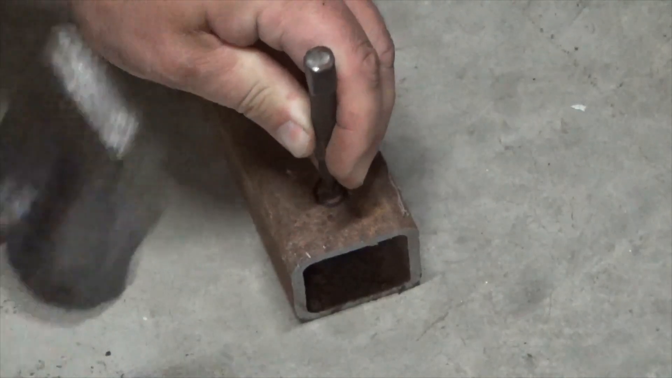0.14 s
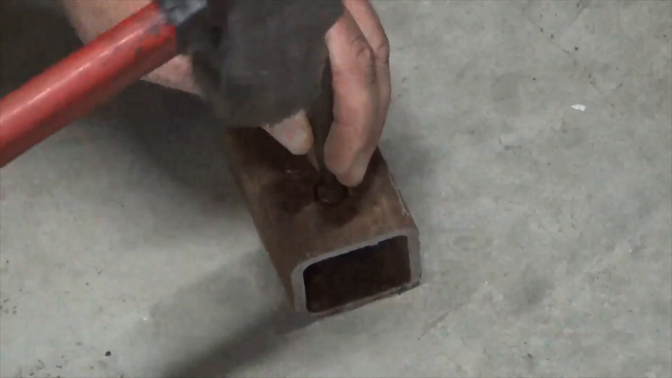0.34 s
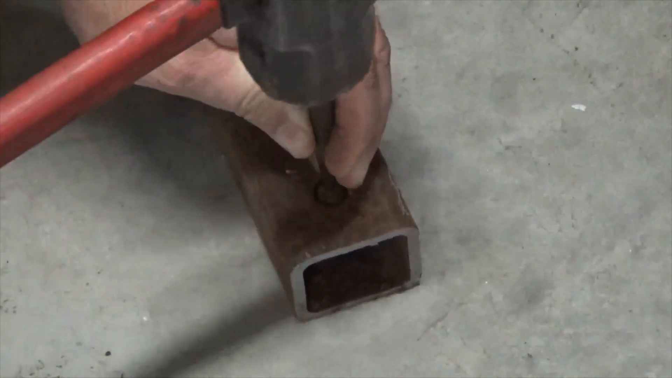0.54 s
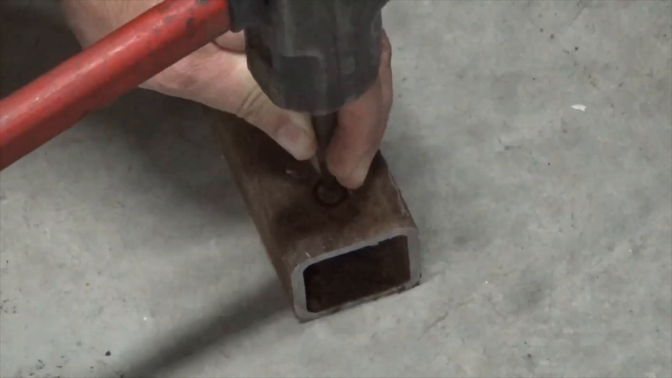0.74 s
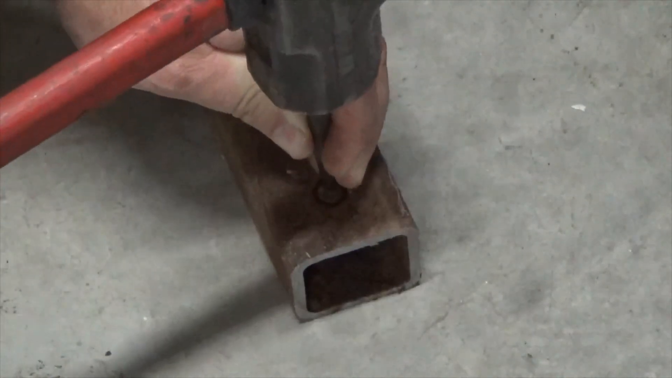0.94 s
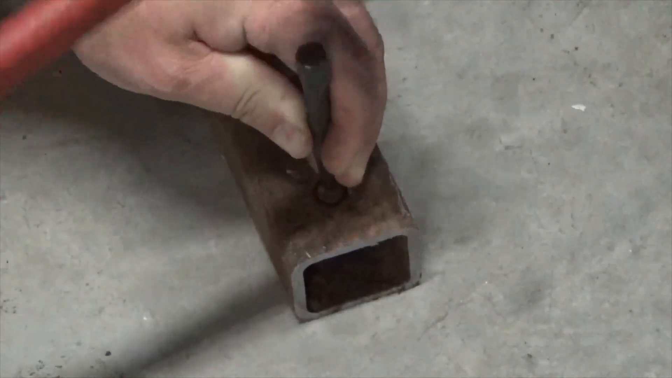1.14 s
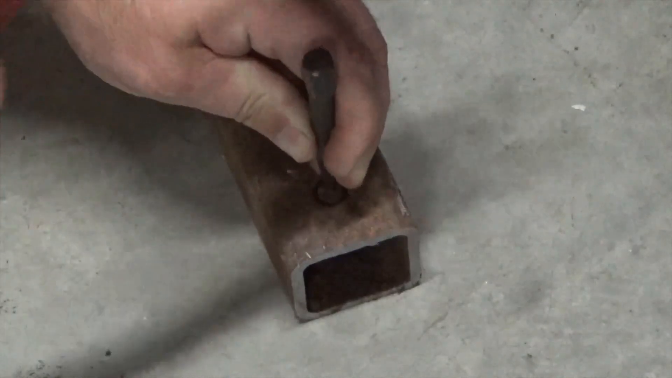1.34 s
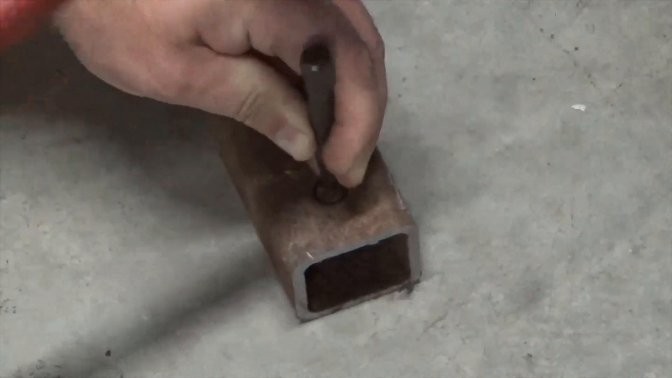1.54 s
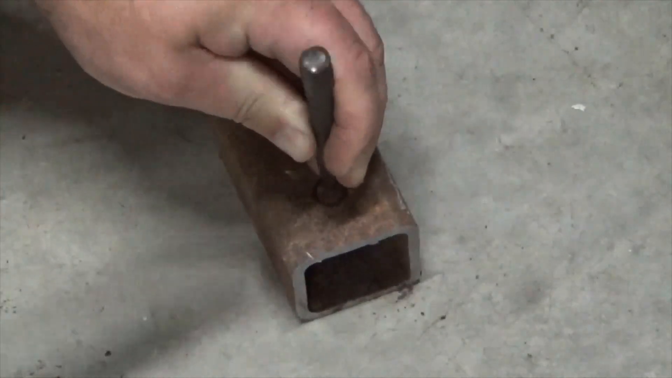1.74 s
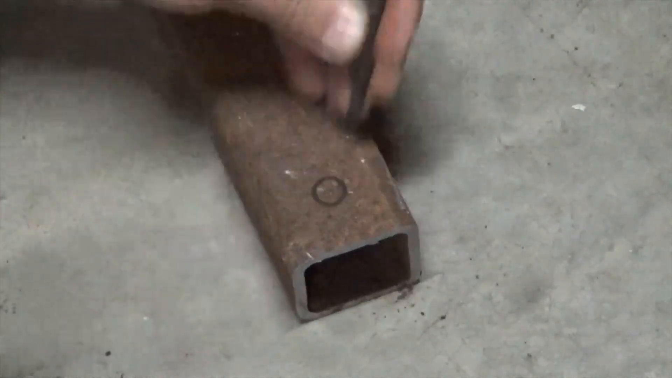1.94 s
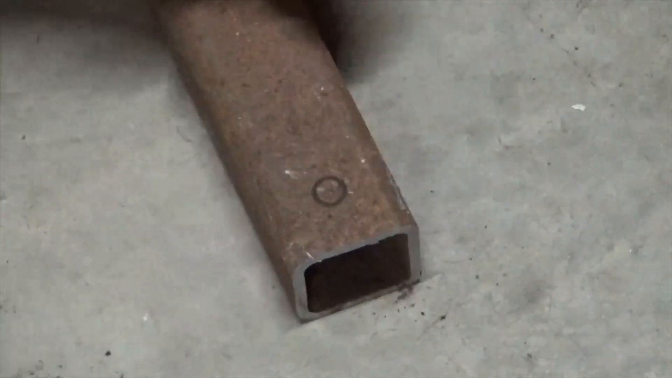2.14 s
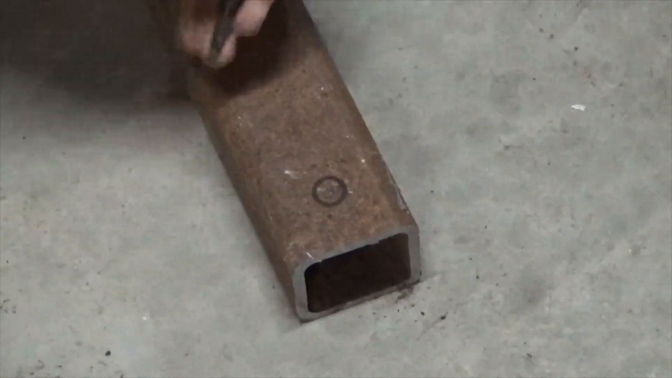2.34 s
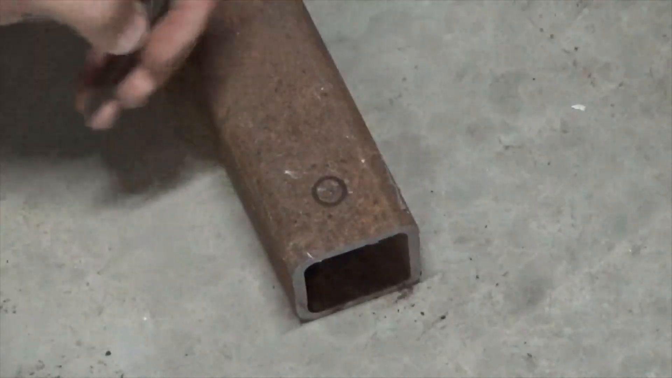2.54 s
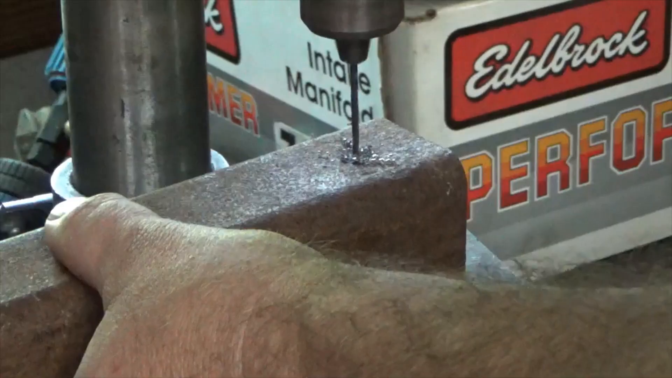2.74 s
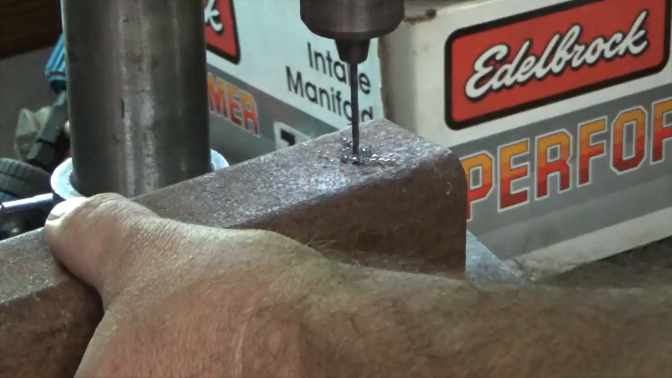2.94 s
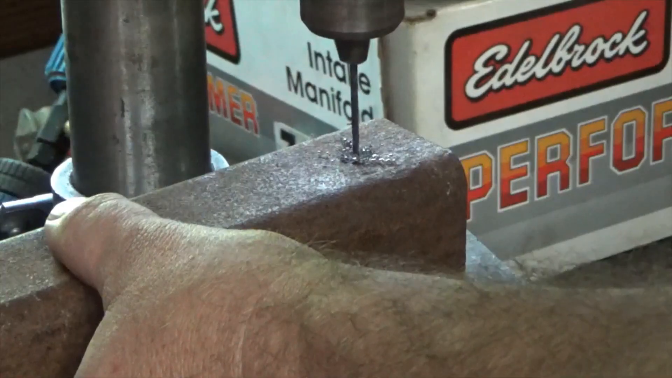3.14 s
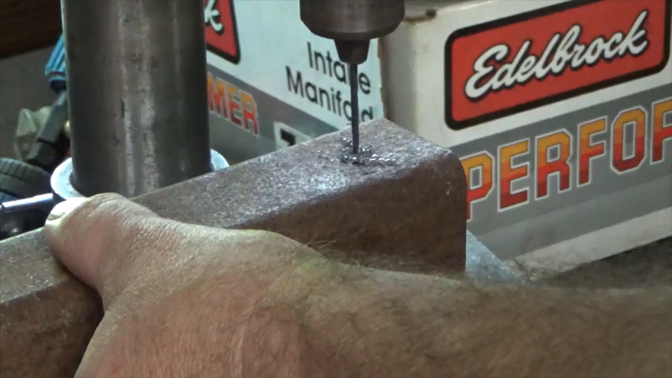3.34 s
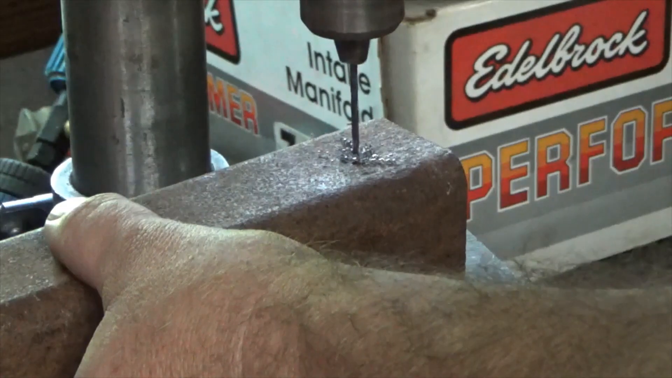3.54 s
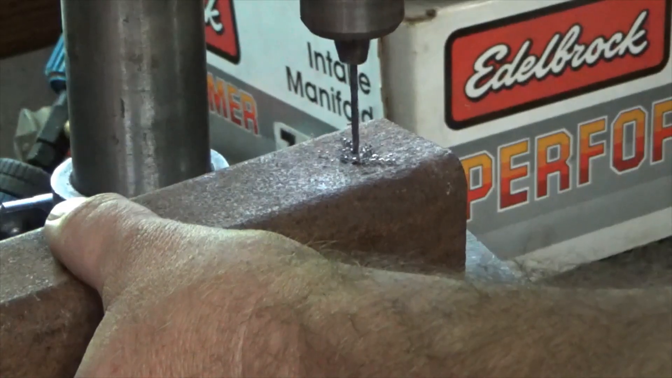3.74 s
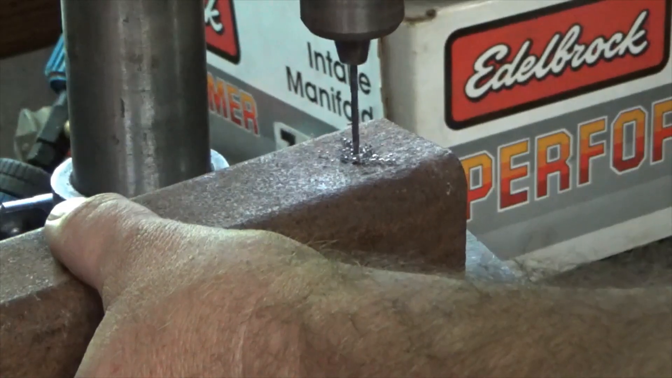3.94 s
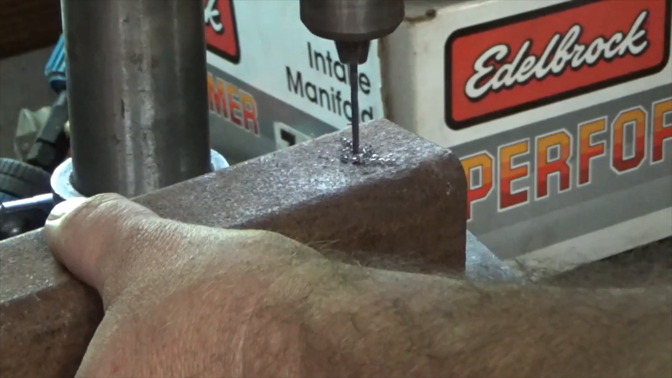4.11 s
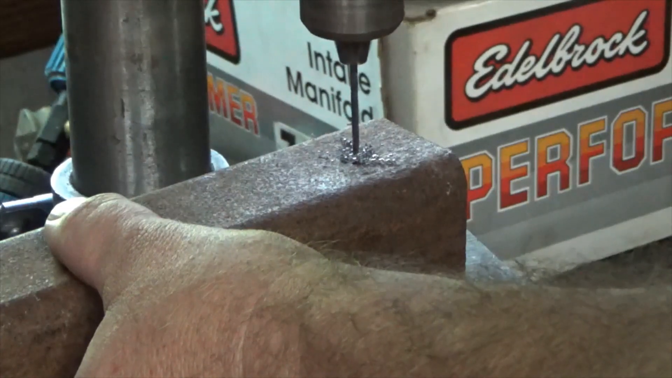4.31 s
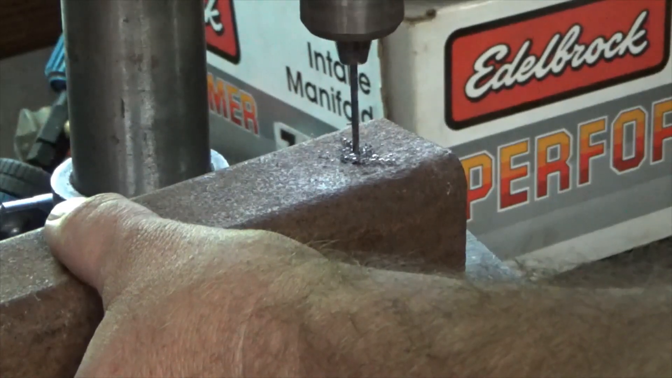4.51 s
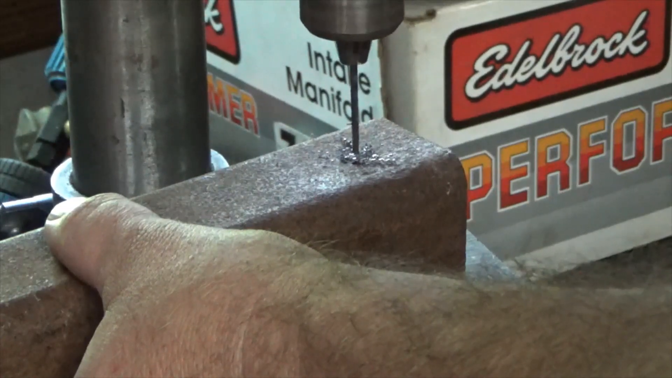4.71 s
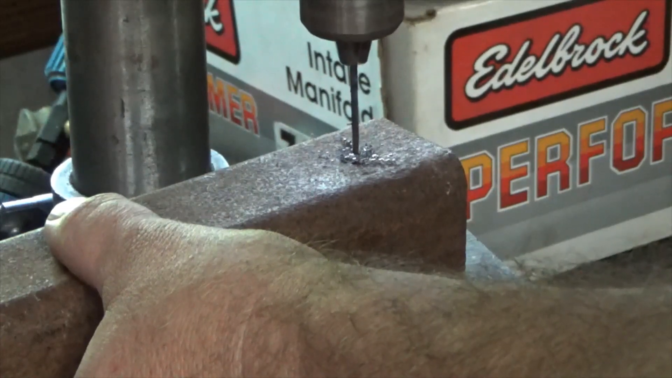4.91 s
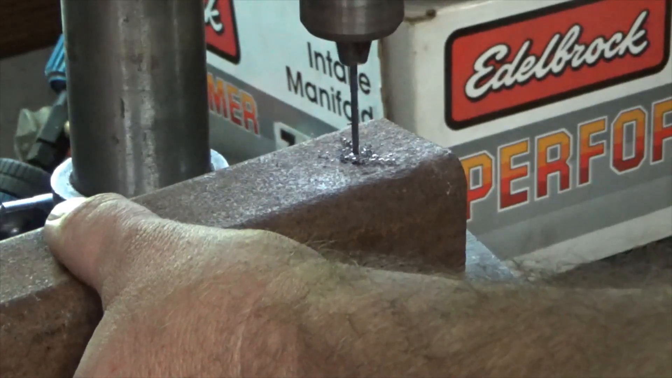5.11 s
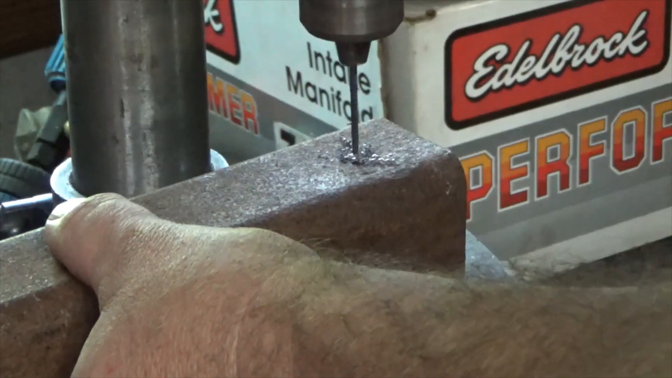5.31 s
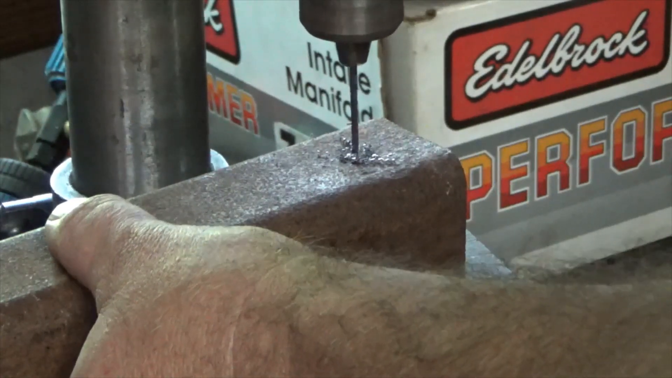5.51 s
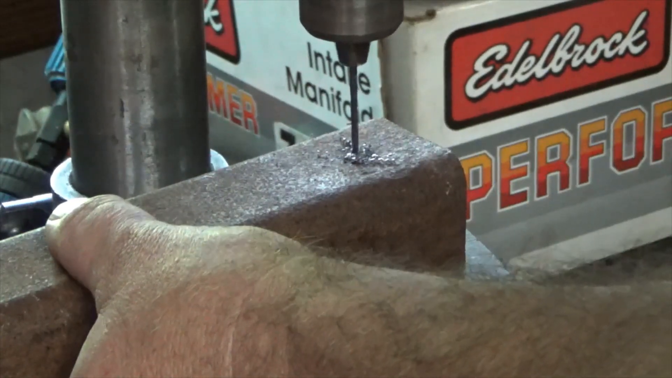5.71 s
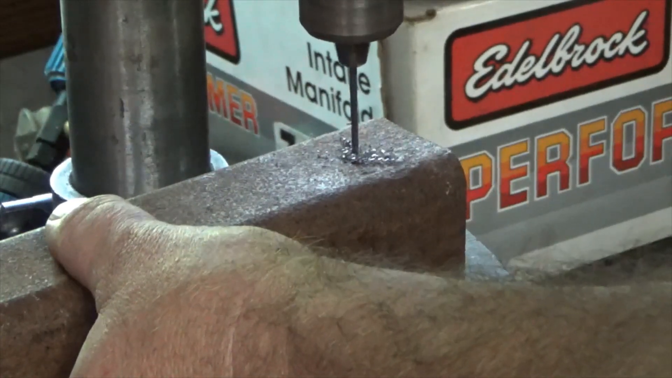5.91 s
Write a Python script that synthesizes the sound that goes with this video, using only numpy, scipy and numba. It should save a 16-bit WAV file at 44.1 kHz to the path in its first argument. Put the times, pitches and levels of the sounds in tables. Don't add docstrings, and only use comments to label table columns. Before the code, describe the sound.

Quiet garage with traffic rumble, two metallic hammer blows, a faint scrape, then an abrupt cut to a humming, crackling drill press biting metal.

```python
import sys
import numpy as np
from scipy import signal
from scipy.fft import rfft, irfft, next_fast_len
from scipy.io import wavfile
from scipy.ndimage import uniform_filter1d
from numba import njit

SR = 44100
rng = np.random.default_rng(int(sys.argv[2]) if len(sys.argv) > 2 else 0)


def gain_from_decibels(decibels):
    exponent = np.asarray(decibels, float) / 20
    return 10 ** exponent


def store_wav(level_fs):
    pcm = np.round(np.clip(np.atleast_2d(level_fs), -1, 1) * 32767)
    wavfile.write(sys.argv[1], SR, pcm.T.astype(np.int16))


N = 262836
T = np.arange(N) / SR
M = next_fast_len(N + SR)
F = np.arange(M // 2 + 1) * SR / M + 0.00085

# first_out_start_s, first_out_end_s, second_in_start_s, second_in_end_s
SHOT_CHANGE_S = (2.688, 2.713, 2.695, 2.757)

# freq_hz, t60_s
ROOM_T60 = [(125, 0.54), (500, 0.37), (2000, 0.48), (5000, 0.65), (10000, 0.41)]
# freq_hz, density_db_per_hz
QUIET_SPECTRUM = [(15, -56.5), (25, -38.5), (47, -8.5), (69, -6), (198, -11.5), (249, -15), (338, -12),
                  (415, -19.5), (448, -19), (2130, -29), (3200, -30.5), (3460, -32), (11200, -39),
                  (14600, -72.5), (22000, -120)]
# freq_hz, likeness_0_1
QUIET_ALIKE = [(60, 1.0), (130, 1), (270, 0.92), (560, 0.4), (1180, 0.1), (2500, 0.03), (5270, 0.27),
               (11100, 0.66)]
# time_s, level_db
TRAFFIC = [(0, -2), (.7, -0.5), (1.2, 0), (1.7, 3), (2.2, 1.5), (2.7, 5)]
# freq_hz, share_ratio
TRAFFIC_SHARE = [(60, .1), (120, 0.52), (300, 1.1), (960, 1.3), (2700, .05)]
# time_s, level_db, length_s
THUDS = [(.68, 2.5, .25), (1.134, -1.5, .15), (1.653, 3.5, .12), (2.55, 1.5, .25)]
# start_s, end_s, pitch_hz, level_db
DRONES = [(0, 1.3, 68.9, -61.5), (.25, 1.35, 297.6, -75), (.25, 1.3, 198, -67.5), (1., 1.67, 88, -62),
          (1.7, 1.7, 125, -59.5), (2.31, 2.44, 100.4, -55.5), (2.31, 3.4, 60.4, -62.5)]

# time_s, peak_db
BLOWS = [
    (0.748, -27),
    (1.387, -9),
]
# freq_hz, level_db, t60_s
HAMMER_MODES = [(4818, -18, .34), (4953, -8, .7), (5281, -10, .6), (5981, -13, .46), (6013, -8, .3),
                (6164, -4, .28), (6595, -18, .28), (7354, -28, .2),
                (3000, -15.5, 0.11), (3630, -10, .08), (8150, -30, 0.083), (9330, -18.5, 0.12),
                     (10750, -30.5, 0.037)]
TUBE_HZ = [2078, 2385, 2579, 2702, 2885, 3394, 3416, 3500, 3618, 4861, 4907, 4926, 5114, 5286, 5480, 5819,
           6067, 6315, 6519, 6790, 7230, 7483, 8818, 9200, 9454, 9502, 9593, 10300, 10620]
# level_db, t60_s
TUBE_DECAY = [(-24.5, .4), (-23.5, 0.86), (-23.5, 0.79), (-26.5, 0.88), (-15.5, 0.33), (-4.5, 1),
              (-2.5, 0.66), (-13.5, 0.513), (-14.5, .35), (-13.5, .6), (-8.5, 0.75), (-3, .45), (-22.5, .7),
              (-20, .6), (-30, 0.51), (-24, .45), (-17, 0.99), (-17.5, 0.403), (-1, 0.25), (-20, 0.5),
              (-13, 0.56), (-19, 0.19), (-28.5, 0.42), (-21.5, 0.66), (-12, 0.31), (-5, 0.45), (-16, 0.15),
              (-10, .1), (-16.5, 0.3)]
# freq_hz, density_db_per_hz
TAP_CRACK = [(59, -33), (100, -8), (420, -7.5), (2330, -20), (4360, -12), (5110, 2), (6470, -30.5),
             (11000, -42.5), (14300, -78.5), (22000, -120)]
# freq_hz, density_db_per_hz
STRIKE_CRACK = [(180, -36), (300, -7), (565, -7), (862, -30), (2100, -9.5), (3060, -28.5), (3400, -9),
                (3950, -20), (5020, -6.5), (8390, -16.5), (9600, -11.5), (11000, -23.5), (14300, -55),
                (22000, -120)]
# delay_s, pitch_hz, width_octaves, level_db, rise_s
TAP_SWELLS = [(0, 351.9, 0.5, -38.5, 0.0019), (0, 2800, .6, -40.5, 0.0029)]
# delay_s, pitch_hz, width_octaves, level_db, rise_s
STRIKE_SWELLS = [(0, 377.6, 0.44, -32, 0.021), (0, 2300, 0.38, -24.5, 0.014), (0, 4550, 0.46, -26, 0.019),
                 (0, 1105, .45, -34.5, 0.0092), (0.061, 2710, 0.355, -26, 0.0092),
                 (0.059, 297, 0.71, -30.5, 0.013)]
# freq_hz, level_db, t60_s
PUNCH_MODES = [(5340, -5, 0.5), (5804, -17, 0.21), (6169, -20.5, 0.53), (6900, 0.5, 0.17),
               (7450, -1.5, 0.27), (7900, -11, 0.17), (8543, -22, 0.16), (9685, -14, 0.3)]
# start_s, end_s, level_db
SCRAPES = [
    (2.348, 2.395, -58.5),
    (2.578, 2.587, -57),
]
# time_s, length_s, pitch_hz, width_octaves, level_db
SLEEVE = (2.02, .1, 6300, .45, -65.5)

HUM_DB = [-45, -36.5, -43, -39, -79, -97, -49.5, -51]
SLOT_DB = [-66, -70, -40.5, -85, -45, -46.5]
# freq_hz, level_db
PULLEY = [(43, -52), (93, -52), (101, -54), (380, -52), (691, -50), (737, -48)]
# freq_hz, density_db_per_hz
RUMBLE = [(25, -9), (45, -1), (75, -8), (100, 1), (160, -19.5), (225, -1.5), (295, -8.5), (385, 1),
          (440, -5), (625, 0.5), (785, -2), (950, -1.5), (1150, -10), (2500, -27.5), (5000, -60)]
# freq_hz, density_db_per_hz
CUT_SPECTRUM = [(650, -25), (1100, 3), (1490, 4.5), (1670, 1), (2090, -2.5), (2260, 0.5), (2850, -2),
                (3300, -4.5), (4810, -3), (5510, -4.5), (5900, -1.5), (6320, -8), (8620, -20), (10800, -32),
                (11200, -42), (14600, -66), (22000, -120)]
# freq_hz, width_hz, level_db
CUT_RING = [(1844, 70, -5), (2273, 90, -4), (2694, 120, -6), (2930, 110, -5), (3080, 40, -4),
            (3885, 150, -10), (4757, 90, -1), (4936, 60, -1), (5229, 70, -4), (5513, 60, -4),
            (5830, 90, -4), (5946, 45, 1), (6454, 60, -8), (6700, 60, -11), (7800, 80, -17)]
# freq_hz, likeness_0_1
DRILL_ALIKE = [(60, 0.99), (130, 0.96), (270, 0.87), (560, 0.74), (1180, 0.72), (2500, 0.78), (5270, 0.85),
               (11100, 0.63)]
# time_s, pitch_hz
WHISTLE = [(2.7, 4335), (4.9, 4312), (5.3, 4280), (6., 4220)]
LONG_LIP_DB = [-32, -28.5, -29, -30, -39, -25, -28, -30, -31.5, -33, -32, -26, -32, -32.5]
# time_s, level_db
SNAPS = [(2.757, -25.5), (2.951, -31), (3.03, -43), (3.254, -30), (3.485, -29.5), (3.571, -28.5),
         (3.625, -30.5), (3.696, -31), (3.771, -29.5), (3.831, -30.5), (3.914, -34), (3.97, -31),
         (4.023, -32), (4.119, -32), (4.163, -29), (4.421, -40), (4.479, -32), (4.59, -29.5), (4.674, -33),
         (4.843, -27), (4.892, -28.5), (4.95, -26.5), (5.024, -31), (5.273, -28), (5.335, -31.5),
         (5.38, -31), (5.476, -33), (5.522, -37), (5.577, -31.5), (5.945, -31)]
# time_s, squeal_db, length_ms
GRABS = [(2.97, -65, 40), (4.04, -63, 32), (4.89, -59, 110), (5.02, -70, 30), (5.17, -68, 30),
         (5.41, -62, 37), (5.96, -57, 50)]
# time_s, level_db
FEED = [(2.75, -33.5), (3.1, -35.5), (3.6, -35), (4.1, -35), (4.75, -36.5), (4.89, -32.5), (5.2, -37.5),
        (5.45, -34.5), (5.96, -37)]
# freq_hz, level_db, t60_s
BIT_MODES = [(2720, -2, 0.038), (4290, -2.5, 0.085), (4890, -4, 0.056), (4980, -4, .06), (5120, 0, 0.044),
             (5990, -1.5, 0.081)]

DRUM_HZ, FIRST_TICK_S = 29.97, .0108
MAGNET_HZ, SLOT_HZ = 120.03, 644.
TURN_S, FIRST_BITE_S = .2265, 2.912
LONG_LIP_MS, SHORT_LIP_MS, SHORT_LIP_DB, SNAP_MS = 43, 22, -36, 8.4
BELT_DB, BELT_SETTLED_DB, BELT_SETTLES_S, BELT_TAKES_S = -39, -49.5, 3.44, 0.21
HOUSING_DB, HOUSING_SETTLED_DB, HOUSING_SETTLES_S, HOUSING_TAKES_S = -40.5, -45, 4.46, 0.22
SQUEAL_DB = -71
WHISTLE_DB, WHISTLE_DB_PER_FORCE_DB, WHISTLE_GRAB_DB = -46.5, .8, 14


def on_log(table, hz):
    table_hz, value = np.array(table).T
    return np.interp(np.log(hz), np.log(table_hz), value)


def curves(table):
    s, *columns = np.transpose(table)
    return [np.interp(T, s, c) for c in columns]


def level(x, db):
    return x * gain_from_decibels(db) / np.sqrt(np.mean(x ** 2))


def shape(x, gain):
    return irfft(rfft(x, M) * gain, M)[..., :x.shape[-1]]


def band(hz, octaves):
    return np.exp(-.5 * (np.log2(F / hz) / octaves) ** 2)


def bump(s, length_s):
    return np.exp(-.5 * ((T - s) / length_s) ** 2)


def burst(s, top_s):
    u = np.clip(T - s, 0, None) / top_s
    return u * np.exp(1 - u)


def gate(start_s, end_s, soft_samples):
    return uniform_filter1d(1. * (T > start_s) * (T < end_s), size=soft_samples)


def settle(first_db, last_db, s, takes_s):
    return last_db + (first_db - last_db) * (.5 - .5 * np.tanh((T - s) / takes_s))


def walk(rate_hz):
    k = int(SR / rate_hz)
    held = np.repeat(rng.standard_normal(N // k + 1), k)
    return 1.5 * uniform_filter1d(uniform_filter1d(held, k), k)[:N]


def ring(x, modes, hold):
    out = 0
    for hz, db, t60_s in modes:
        pole = np.exp((2j * np.pi * hz - np.log(1000) / (hold * t60_s)) / SR)
        out = out + gain_from_decibels(db) * signal.lfilter([1], [1, -pole], x).imag
    return out


def pair(mid, side, alike):
    c = np.clip(on_log(alike, F), 0, .995) ** .5
    mid, side = shape(mid, np.sqrt(1 + c)), shape(side, np.sqrt(1 - c))
    return np.array([mid + side, mid - side]) / 2


@njit
def follow(x, attack, release):
    e, out = 0., np.empty(len(x))
    for i in range(len(x)):
        e += (x[i] - e) * (attack if x[i] > e else release)
        out[i] = e
    return out


def quiet():
    (near_db,), street = curves(TRAFFIC), 0
    thud_db = sum(db * bump(s, length_s) for s, db, length_s in THUDS)
    for hz in 30 * 2 ** np.arange(0, 8.6, .5):
        flicker_db = 0.4 * walk(8.4)
        db = on_log(TRAFFIC_SHARE, hz) * near_db + thud_db / (1 + (hz / 130.0) ** 4) + flicker_db
        colour = band(hz, 0.29) * gain_from_decibels(on_log(QUIET_SPECTRUM, F))
        street = street + gain_from_decibels(db) * shape(rng.standard_normal((2, N)), colour)
    ticks = np.zeros(N)
    at = (SR * np.arange(FIRST_TICK_S, 2.75, 1 / DRUM_HZ)).astype(int)
    ticks[at] = gain_from_decibels(1.2 * rng.standard_normal(len(at)))
    drum = shape(ring(ticks, [(3180, -1.5, 0.035), (2460, -13, .02)], 1), band(3000, 0.4))
    return level(pair(*street, QUIET_ALIKE), -52.5) + gain_from_decibels(-57) * drum


def drones():
    out = 0
    for start_s, end_s, hz, db in DRONES:
        gain = gain_from_decibels(db + 5.5 + 1.0 * walk(12.56))
        tone = np.cos(2 * np.pi * hz * T + 0.99 * walk(5.6))
        out = out + gain * tone * gate(start_s, end_s, 2000)
    return out


def room_tail(rise_s):
    t = T[:SR]
    x = 0
    for hz in 90 * 2 ** np.arange(0, 7.6, .75):
        decay = gain_from_decibels(-60 * t / on_log(ROOM_T60, hz))
        x = x + shape(rng.standard_normal((2, SR)), band(hz, 0.4)) * decay
    return rfft(x * (1 - np.exp(-t / rise_s)) / np.sqrt(np.sum(x ** 2) / 2), M)


def scrape():
    grit = level(rng.standard_normal(N) * gain_from_decibels(2.2 * rng.exponential(size=N)), 0)
    (drag_start_s, drag_end_s, drag_db), (brush_start_s, brush_end_s, brush_db) = SCRAPES
    brushing = (T > brush_start_s) * (T < brush_end_s)
    brush = gain_from_decibels(brush_db) * brushing * shape(grit, band(5000, .5))
    push = gate(drag_start_s, drag_end_s, 800) * gain_from_decibels(2.3 * walk(70))
    s, length_s, hz, octaves, sleeve_db = SLEEVE
    sleeve = bump(s, length_s) * level(shape(grit, band(hz, octaves)), sleeve_db)
    return ring(gain_from_decibels(drag_db - 14) * push * grit, PUNCH_MODES, 0.069) + brush + sleeve


def boom(s, hz, octaves, db, top_s):
    return level(shape(rng.standard_normal(N), band(hz, octaves)), db) * burst(s, top_s)


def blow(s, db, modes, hold, crack, crack_db, crack_s, first_db, lag_s):
    sample = np.arange(N)
    click = gain_from_decibels(first_db) * (sample == int(s * SR)) + (sample == int((s + lag_s) * SR))
    noise = level(shape(rng.standard_normal(N), gain_from_decibels(on_log(crack, F))), crack_db)
    thin = signal.butter(3, 1350, "high", fs=SR, output="sos")
    return gain_from_decibels(db) * (signal.sosfilt(thin, ring(click, modes, hold)) + noise * burst(s, crack_s))


def bench():
    (tap_s, tap_db), (strike_s, strike_db) = BLOWS
    tube = [(hz, *row) for hz, row in zip(TUBE_HZ, TUBE_DECAY)]
    tap = blow(tap_s, tap_db - 2.0, HAMMER_MODES, 0.26, TAP_CRACK, -2, 0.0017, -9, 0.0028)
    tap = tap + sum(boom(tap_s + s, *row) for s, *row in TAP_SWELLS)
    strike = blow(strike_s, strike_db + 3.5, tube, 0.27, STRIKE_CRACK, 1.9, 0.0014, -17.0, .0007)
    ahead = gain_from_decibels(-40) * np.roll(strike, -int(.003 * SR))
    strike = strike + ahead + sum(boom(strike_s + s, *row) for s, *row in STRIKE_SWELLS)
    drag = scrape()
    mid, side = shape(gain_from_decibels(-9) * tap + gain_from_decibels(-0.5) * strike + gain_from_decibels(-17) * drag, room_tail(0.003))
    room = mid + gain_from_decibels(-8.5) * side * np.array([[1], [-1]])
    return tap + strike + drag + room + quiet() + drones()


def motor(belt_db, housing_db):
    lines = [(k * MAGNET_HZ, db) for k, db in enumerate(HUM_DB, 1)] + PULLEY
    lines += [(SLOT_HZ + k * MAGNET_HZ, db) for k, db in enumerate(SLOT_DB, -2)]
    hum = 0
    for hz, db in lines:
        sway_db, sway_rad = .7 * walk(8), .15 * walk(5)
        hum = hum - gain_from_decibels(db + 2 + sway_db) * np.cos(2 * np.pi * hz * T + sway_rad)
    shake = 1 + 0.033 * np.cos(2 * np.pi * MAGNET_HZ * T)
    noise = rng.standard_normal((3, 2, N)) * shake * gain_from_decibels(0.59 * walk(18))
    rumble = level(shape(noise[0], gain_from_decibels(on_log(RUMBLE, F))), -34.5)
    belt = gain_from_decibels(belt_db - 1) * level(shape(noise[1], band(157, 0.34)), 0)
    housing_bands = band(1322, 0.022) + 0.72 * band(1459, 0.038)
    housing = gain_from_decibels(housing_db - 3) * level(shape(noise[2], housing_bands), 0)
    return hum * np.array([[1], [0]]) + rumble + belt + housing


def whistle(hz, db):
    shake_hz, shake_db = 15 * walk(150), 1.5 * walk(35)
    phase = 2 * np.pi * np.cumsum(hz + shake_hz) / SR
    return gain_from_decibels(db - 0.5 + shake_db) * np.sin(phase) * np.array([[1], [.3]])


def pings():
    s, db = np.transpose(SNAPS)
    scatter, out = rng.standard_normal((len(BIT_MODES), len(s))), 0
    for mode, chance in zip(BIT_MODES, scatter):
        knocks = np.zeros(N)
        knocks[(SR * (s - .004)).astype(int)] = gain_from_decibels(db - 7.5 + 3.1 * chance)
        out = out + ring(knocks, [mode], 1)
    return out * np.array([[1], [.3]])


def bites():
    at = FIRST_BITE_S + TURN_S * np.arange(len(LONG_LIP_DB))
    rows = [(s, db, LONG_LIP_MS) for s, db in zip(at, LONG_LIP_DB)]
    rows += [(s + TURN_S / 2, SHORT_LIP_DB, SHORT_LIP_MS) for s in at]
    rows += [(s, db, SNAP_MS) for s, db in SNAPS]
    return np.sqrt(sum(gain_from_decibels(db - 4.5) ** 2 * bump(s, 0.00029 * ms) for s, db, ms in rows))


def cutting(feed_db, bite, squeal_gain):
    chips = rng.standard_normal((2, 2, N)) * gain_from_decibels(2.2 * rng.exponential(size=(2, 1, N)))
    colour = gain_from_decibels(on_log(CUT_SPECTRUM, F)) * band(6900, 2.3)
    rub, tear = level(shape(chips, colour), 0.65)
    tear = shape(tear, (F / 4000) ** 0.096)
    rings = 0
    for hz, width_hz, db in CUT_RING:
        uneven_db = 2.2 * walk(15)
        resonance = 1 / (1 + 1j * (F - hz) / (0.23 * width_hz))
        rings = rings + gain_from_decibels(db + uneven_db) * level(shape(chips[0], resonance), 0) * np.sqrt(width_hz)
    squeal = level(shape(rng.standard_normal((2, N)), band(10530, .006)), 1)
    rubbing = gain_from_decibels(feed_db - 3) * (rub + level(rings, -6))
    tearing = bite * (tear + level(rings, -13.5))
    return rubbing + tearing + squeal_gain * squeal


def drill_press():
    (feed_db,), bite = curves(FEED), bites()
    grab = sum(gain_from_decibels(db) * bump(s, 0.00037 * ms) for s, db, ms in GRABS)
    force_db = 10 * np.log10(1 + (bite / gain_from_decibels(feed_db + 6)) ** 2) + feed_db - np.mean(feed_db)
    belt_db = settle(BELT_DB, BELT_SETTLED_DB, BELT_SETTLES_S, BELT_TAKES_S)
    housing_db = settle(HOUSING_DB, HOUSING_SETTLED_DB, HOUSING_SETTLES_S, HOUSING_TAKES_S) + 0.35 * force_db
    sing = gain_from_decibels(WHISTLE_DB + WHISTLE_DB_PER_FORCE_DB * force_db) + gain_from_decibels(WHISTLE_GRAB_DB) * grab / 2
    machine = motor(belt_db, housing_db)
    cut = cutting(feed_db, bite, gain_from_decibels(SQUEAL_DB) + grab)
    return machine + cut + pings() + whistle(*curves(WHISTLE), 20 * np.log10(sing))


def scene():
    out_start_s, out_end_s, in_start_s, in_end_s = SHOT_CHANGE_S
    fade_out = np.clip((out_end_s - T) / (out_end_s - out_start_s), 0, 1)
    fade_in = np.clip((T - in_start_s) / (in_end_s - in_start_s), 0, 1) ** 4.1
    press = np.sqrt(2) * pair(*drill_press(), DRILL_ALIKE)
    balance_db = np.array([[-.25], [.25]])
    return (bench() * fade_out + press * fade_in) * gain_from_decibels(balance_db)


def band_limit(x):
    return signal.sosfilt(signal.butter(12, 11050, fs=SR, output="sos"), x)


def record(dry):
    bass_cut = signal.butter(3, 36, "high", fs=SR, output="sos")
    top_cut = signal.ellip(10, .3, 75, 10950, fs=SR, output="sos")
    dry = signal.sosfilt(bass_cut, dry)
    loud = np.roll(follow(np.abs(dry).max(axis=0), 0.12, 0.0031), shift=-40)
    limited = dry * np.minimum(1, gain_from_decibels(-8.5) / (loud + 1e-9)) ** 1.07
    mix = signal.sosfilt(top_cut, .55 * np.tanh(limited / .55))
    return band_limit(mix)


dry = scene()
out = record(dry)
store_wav(out)
```